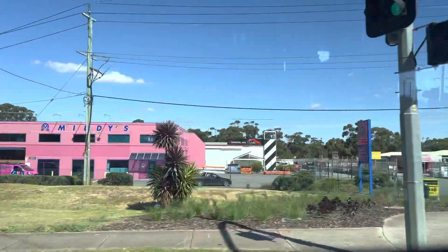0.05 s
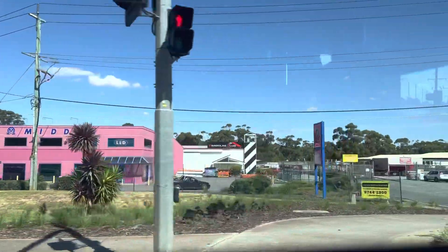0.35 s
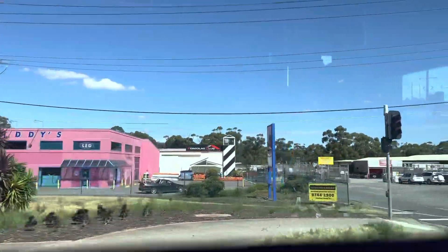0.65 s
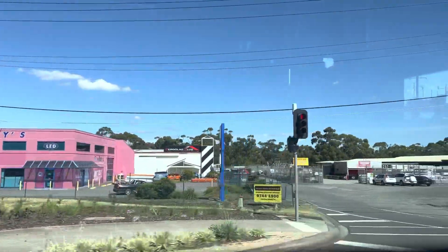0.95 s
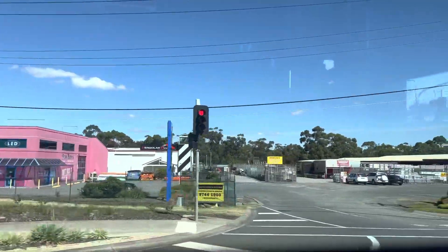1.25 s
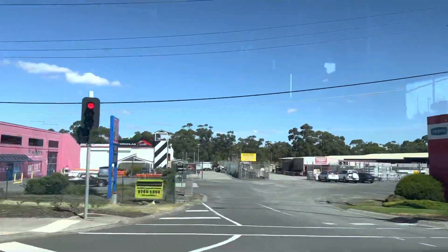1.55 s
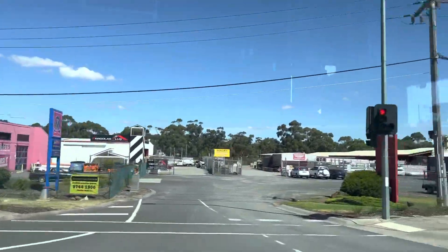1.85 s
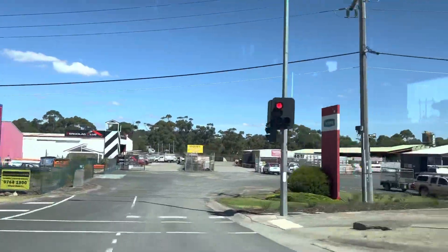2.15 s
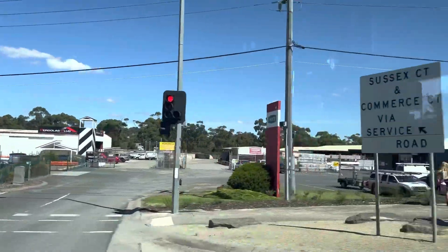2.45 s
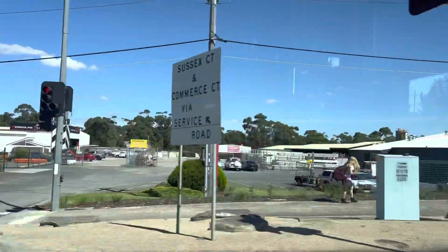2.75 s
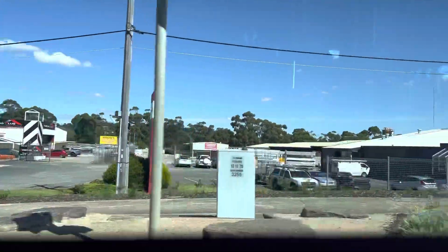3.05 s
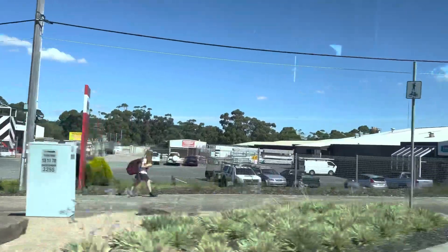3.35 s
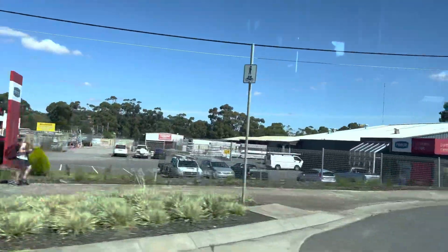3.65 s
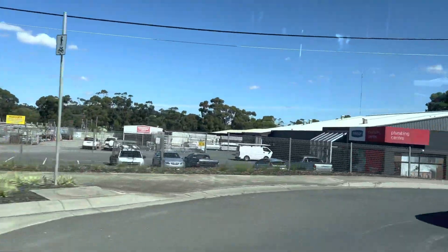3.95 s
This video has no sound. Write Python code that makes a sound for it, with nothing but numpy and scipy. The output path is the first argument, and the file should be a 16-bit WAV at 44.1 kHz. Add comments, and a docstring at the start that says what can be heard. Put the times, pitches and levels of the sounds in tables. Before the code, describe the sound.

A bus engine booms low over road rumble, heard from a passenger seat. After about a second it shifts up, drops in pitch and settles into a pulsing drone, while panels knock and window frames rattle lightly.

```python
"""Inside a city bus that takes a corner and shifts up a gear after one second.
The engine's firing harmonics boom as they pass through the cabin's resonances. In the higher gear a
driveline drone beats against the second harmonic, while the body rumbles and the tyres roar below.
Bumps make the trim buzz, panels knock, window frames chatter and small fittings tick.
A gear hum, thin squeals and one brief rub of a seat fitting lie faintly behind."""
import sys
import numpy as np
from scipy import signal
from scipy.fft import rfft, irfft
from scipy.io import wavfile

SR = 44100
rng = np.random.default_rng(int(sys.argv[2]) if len(sys.argv) > 2 else 0)


def wav_record(signal):
    """Record a signal, one row per channel, as 16-bit PCM in the file named by sys.argv[1]."""
    frames = np.transpose(np.atleast_2d(signal))
    bounded = np.clip(frames, -1, 1)
    # unit amplitude maps onto the largest positive 16-bit level
    quanta = np.round(bounded * 32767).astype(np.int16)
    wavfile.write(sys.argv[1], SR, quanta)


N = 176400
TIME = np.arange(N) / SR

# Engine speed. Each row: time in seconds, firing rate in Hz.
FIRING_RATE = [(0, 57.8), (.3, 60.2), (.85, 61), (1.0, 56.3), (1.12, 50), (1.27, 46.5), (1.55, 44.1),
               (2.1, 44.2), (2.8, 45.1), (4, 47.1)]
# Engine load, easing for the gear change. Each row: time in seconds, gain in dB.
ENGINE_LOAD = [(0, .5), (.5, 1), (.88, 0), (1.15, -4), (1.45, -1.5), (2.9, -2.5), (3.8, 2)]
# Cabin response to an engine harmonic. Each row: frequency in Hz, level in dB before the load gain.
CABIN_RESPONSE = [(44, -32.5), (47, -25.5), (54, -15.5), (60, -13), (88, -20.5), (93, -18), (120, -17.5),
                  (133, -34.5), (160, -37.5), (178, -25), (188, -24.5), (230, -40.5), (370, -41.5)]
# Driveline drone. Each row: time in seconds, level in dB.
DRONE_LEVEL = [(0, -58), (1.2, -55), (1.6, -15), (3.05, -14.5), (3.45, -19.5), (4, -18)]

# Spectra of body rumble, tyre roar and trim buzz. Each row: frequency in Hz, relative density in dB.
RUMBLE_SPECTRUM = [(12, -27), (25, -16), (40, -11.5), (62, 2), (80, 0.5), (98, 2.5), (126, -1.5), (150, -8),
                   (190, -6), (225, -13), (260, -12), (300, -24), (500, -48.5), (2000, -120)]
ROAR_SPECTRUM = [(100, -21), (200, 2), (470, 0), (600, -2.5), (750, -2.5), (900, -12), (1130, -16),
                 (1400, -14.5), (1900, -21.5), (2400, -20.5), (3200, -30.5), (6000, -31.5), (10000, -45),
                 (16000, -66.5)]
BUZZ_SPECTRUM = [(500, -5.5), (1000, 7.5), (2300, 5.5), (3300, 3), (4800, -1.5), (6200, 4), (7300, -1.5),
                 (9300, -8), (15500, -16)]
# Envelopes of the same three. Each row: time in seconds, level in dB.
RUMBLE_LEVEL = [(0, -16), (.6, -14.5), (.85, -12.5), (1.05, -16), (1.35, -13.5), (1.7, -16.5), (2.5, -17.5),
                (4, -18.5)]
ROAR_LEVEL = [(0, -26.5), (.35, -27.5), (.62, -25), (.9, -25.5), (1.04, -29.5), (1.25, -27), (2.1, -29.5),
              (3.1, -28), (3.68, -26), (4, -28.5)]
BUZZ_LEVEL = [(0, -48.5), (.33, -50), (.45, -42), (.6, -44), (.67, -38.5), (.83, -41.5), (.89, -41),
              (.98, -49.5), (1.11, -41), (1.48, -43), (1.62, -45), (2.1, -54.5), (2.55, -51), (3.08, -44.5),
              (3.25, -54.5), (3.55, -44), (3.8, -53), (3.885, -39), (3.94, -55)]

# Blows on panels. Each row: start in seconds, level in dB, factor on the mode frequencies.
KNOCKS = [(.287, -32.5, .98), (.5615, -25, 1.03), (.567, -30, .97), (0.581, -33.5, 1.1),
          (.736, -32.5, 1.05), (.81, -32.5, 1), (1.276, -34, .92), (1.512, -31, .96), (1.73, -33, .95),
          (1.975, -35, .95), (2.253, -37, 1), (2.596, -35, .94), (2.756, -31, .96), (3.644, -30.5, 1.18),
          (3.652, -34, 1.12)]
# Panel modes. Each row: frequency in Hz, relative level in dB, time to fall 60 dB in seconds.
PANEL_MODES = [(960, -1, 0.037), (1800, -9, 0.024), (2168, -3, 0.04), (2355, -7, 0.043), (2670, -9, 0.019),
               (3320, -20.5, 0.02)]
# Rattles of loose window frames. Each row: start in seconds, level in dB.
CHATTERS = [(.566, -42.5), (.647, -36.5), (.707, -36), (.735, -34.5), (.885, -40), (1.17, -42),
            (1.437, -41.5), (1.449, -35.5), (1.499, -40.5), (3.325, -44), (3.52, -44.5), (3.581, -46.5)]
# Ticks of metal fittings. Each row: start in seconds, level in dB, resonance in Hz.
TICKS = [(.649, -37, 13000), (1.174, -41, 12500), (1.221, -39, 13000), (1.307, -39, 12000),
         (1.449, -40, 11100), (2.562, -46, 8600), (3.325, -48, 14000), (3.514, -46, 12500),
         (3.532, -47, 12000), (3.581, -41.5, 9300)]
# Spectra of panel thud, frame chatter and seat rub. Each row: frequency in Hz, relative density in dB.
THUD_SPECTRUM = [(300, -9.5), (1000, 3), (1400, 2), (2400, 4.5), (3300, -10), (7000, -13.5), (14000, -38)]
CHATTER_SPECTRUM = [(1000, -14.5), (2500, 7.5), (4000, 0.5), (6000, 7.5), (9000, -3.5), (15500, -22)]
RUB_SPECTRUM = [(2800, -21.5), (4000, -2), (4500, 3), (5300, -18), (8000, -34)]
# Gear hum and squeals. Each row: start and end in seconds, pitch in Hz, level in dB, leftward pan in dB.
WHINES = [(1.35, 3.08, 305, -37.5, -1), (3.1, 3.31, 1380, -48, 0), (3.64, 3.9, 1315, -54, 0),
          (2.92, 3.2, 7920, -65, 0), (.58, .74, 7950, -58, 0)]

# Likeness of the two microphone signals. Each row: frequency in Hz, correlation (clipped to -1..1 in use).
CORRELATION = [(60, 2), (110, 1.1), (190, 1.35), (270, -0.02), (400, 0.4), (700, 0.04), (1250, -0.5),
               (2200, 0.02)]
# Stereo balance. Each row: frequency in Hz, left minus right in dB.
BALANCE = [(150, 0.36), (300, -2.3), (600, -1.2), (1100, -2.2), (2200, 1), (3800, -0.64), (9000, 0.33)]


def engine(firing_hz, harmonics=6, waver_db=1.23, jitter_rad=0.04):
    """Forced vibration: firing harmonics swell and fade as they slide through the cabin's resonances."""
    out, firing_phase = 0, phase_of(firing_hz)
    for k in range(1, harmonics + 1):
        level_db = at_hz(CABIN_RESPONSE, k * firing_hz) + waver_db * drift(6.2)
        phase = k * (firing_phase + jitter_rad * drift(16.0)) + rng.uniform(0, 2 * np.pi)
        out = out + from_db(level_db) * np.sin(phase)
    return np.sqrt(2) * out * from_db(in_time(ENGINE_LOAD))


def driveline(firing_hz, ratio=2.235):
    """Beating: a drone just above the engine's second harmonic meets it in phase some ten times a second."""
    level_db = in_time(DRONE_LEVEL) - 0.5 * drift(2.3)
    phase = ratio * phase_of(firing_hz) + rng.uniform(0, 2 * np.pi)
    return np.sqrt(2) * from_db(level_db) * np.sin(phase)


def road(firing_hz, flutter_db=0.97, clatter_depth=0.044):
    """Random excitation: the body rumbles, and a fluttering tyre roar pulses slightly with each firing."""
    rumble = cabin_field(rng.standard_normal((2, N)), RUMBLE_SPECTRUM)
    flutter = from_db(flutter_db * drift(13.4))
    clatter = 1 + clatter_depth * np.cos(phase_of(firing_hz))
    roar = cabin_field(rng.standard_normal((2, N)) * flutter * clatter, ROAR_SPECTRUM)
    return rumble * from_db(in_time(RUMBLE_LEVEL)) + roar * from_db(in_time(ROAR_LEVEL))


def panel_knocks(thud_db=-8.5, scatter_rad=1, pan_db=-0.5):
    """Modal ringing: a struck panel sounds as a sum of damped sinusoids over a short thud."""
    out = from_db(thud_db) * cabin_field(bursts([row[:2] for row in KNOCKS], t60_s=0.12), THUD_SPECTRUM)
    hz, mode_db, t60_s = np.transpose(PANEL_MODES)[:, :, None]
    age = TIME[:SR // 10]
    envelopes = from_db(mode_db - 60 * age / t60_s)
    for start_s, level_db, pitch in KNOCKS:
        # each mode reaches the two microphones at different phases
        phases = rng.uniform(0, 2 * np.pi, hz.shape) + scatter_rad * rng.standard_normal((2, *hz.shape))
        modes = envelopes * np.sin(2 * np.pi * pitch * hz * age + phases)
        start = int(start_s * SR)
        out[:, start:start + len(age)] += modes.sum(axis=1) * from_db(level_db)
    return out * pan(pan_db)


def trim_buzz(contacts_per_s=740, spread_db=3.5, hiss_share=0.86):
    """Shot noise: shaken trim makes countless tiny contacts, which the cabin mostly blurs to a hiss."""
    sizes = from_db(spread_db * np.minimum(rng.exponential(1, (2, N)), 4))
    signs = rng.choice([-1, 1], (2, N))
    touching = rng.random((2, N)) < contacts_per_s / SR
    contacts = np.sqrt(1 - hiss_share) * unit_rms(sizes * signs * touching)
    hiss = np.sqrt(hiss_share) * rng.standard_normal((2, N))
    return cabin_field(contacts + hiss, BUZZ_SPECTRUM) * from_db(in_time(BUZZ_LEVEL) + drift(27))


def frame_chatter(grit_db=2.8):
    """Intermittent contact: loose window frames clatter in uneven, decaying bursts."""
    rattle = cabin_field(bursts(CHATTERS, t60_s=0.18), CHATTER_SPECTRUM)
    return rattle * unit_rms(from_db(grit_db * drift(140)))


def fitting_ticks(bandwidth_hz=2000):
    """Damped resonance: each click excites the broad, high mode of a small metal fitting."""
    out, radius = 0, np.exp(-np.pi * bandwidth_hz / SR)
    for start_s, level_db, hz in TICKS:
        click = bursts([(start_s, level_db)], t60_s=0.026, tail_db=-18)
        resonator = [1, -2 * radius * np.cos(2 * np.pi * hz / SR), radius ** 2]
        out = out + signal.lfilter([1, 0, -1], resonator, click + 1e-18)
    return out * np.sqrt((1 - radius ** 2) / 2)


def whines(fade_s=0.054, wander=0.005, waver_db=2.9):
    """Random modulation: the gear hum and squeals are single tones, unsteady in pitch and level."""
    out = 0
    for start_s, end_s, hz, level_db, pan_db in WHINES:
        fade = np.clip(np.minimum(TIME - start_s, end_s - TIME) / fade_s, 0, 1)
        tone = np.sqrt(2) * np.sin(phase_of(hz * (1 + wander * drift(31.0))))
        out = out + fade * tone * from_db(level_db + waver_db * drift(8.6)) * pan(pan_db)
    return out


def seat_rub(peak_s=2.705, half_width_s=0.066, level_db=-50.5):
    """Friction noise: a seat fitting rubs unevenly, swelling and dying away."""
    swell = np.exp(-((TIME - peak_s) / half_width_s) ** 2)
    friction = cabin_field(rng.standard_normal((2, N)), RUB_SPECTRUM)
    return friction * swell * from_db(level_db + 2 * drift(50))


def bursts(blows, t60_s, tail_db=-7, cabin_t60_s=0.35):
    """Exponential decay: each blow's dense, noisy ring adds in power to the cabin's reverberant tail."""
    power = np.zeros(N)
    for start_s, level_db in blows:
        start = int(start_s * SR)
        age = TIME[:N - start]
        direct = from_db(level_db - 60 * age / t60_s)
        tail = from_db(level_db + tail_db - 60 * age / cabin_t60_s)
        power[start:] += direct ** 2 + tail ** 2
    return np.sqrt(power) * rng.standard_normal((2, N))


def cabin_field(pair, spectrum, ripple_db=2, mode_spacing_hz=60.15):
    """Diffuse field: sound coloured by dense cabin modes reaches two microphones partly correlated."""
    hz = np.fft.rfftfreq(N, 1 / SR)
    ripple = np.interp(hz / mode_spacing_hz, np.arange(1000), rng.standard_normal(1000))
    ripple *= np.minimum(hz / 1000, 1) ** 2  # full depth above 1 kHz
    mid, side = rfft(pair) * unit_rms(from_db(at_hz(spectrum, hz) + ripple_db * ripple))
    correlation = np.clip(at_hz(CORRELATION, hz), -1, 1)
    common = np.sqrt((1 + correlation) / 2) * mid
    opposed = np.sqrt((1 - correlation) / 2) * side
    return irfft(np.array([common + opposed, common - opposed]) * pan(at_hz(BALANCE, hz)), N)


def drift(corner_hz, step=40):
    """Low-pass noise: a smooth random wander of unit spread."""
    pole = np.exp(-2 * np.pi * corner_hz * step / SR)
    noise = rng.standard_normal(N // step + 2002)
    slow = signal.lfilter([1], [1, -2 * pole, pole ** 2], noise)[2000:]  # once the filter has settled
    return np.interp(np.arange(N) / step, np.arange(len(slow)), unit_rms(slow))


def phase_of(hz):
    """Phase in radians, the time integral of frequency."""
    return 2 * np.pi * np.cumsum(hz) / SR


def pan(db):
    """Left and right gains for a level difference in dB."""
    return from_db(np.array([[1], [-1]]) * db / 2)


def from_db(db):
    """Decibels to amplitude ratio."""
    return 10 ** (np.asarray(db) / 20)


def unit_rms(x):
    """Normalisation to unit power."""
    return x / np.sqrt(np.mean(x ** 2) + 1e-20)


def in_time(rows):
    """Linear interpolation of a table at every sample."""
    return np.interp(TIME, *np.transpose(rows))


def at_hz(rows, hz):
    """Interpolation of a table on a log-frequency axis."""
    row_hz, values = np.transpose(rows)
    return np.interp(np.log(np.maximum(hz, 1)), np.log(row_hz), values)


def scene(left_lag_s=0.00022):
    """Superposition: engine, road and rattles add at a passenger seat."""
    firing_hz = in_time(FIRING_RATE)
    boom = engine(firing_hz) + driveline(firing_hz)
    left_boom = np.interp(TIME - left_lag_s, TIME, boom)
    rattles = panel_knocks() + frame_chatter() + fitting_ticks() + seat_rub()
    return np.array([left_boom, boom]) + road(firing_hz) + whines() + trim_buzz() + rattles


def record(dry):
    """Soft saturation rounds the highest peaks; a low-pass filter stops the treble above 16.8 kHz."""
    rounded = dry / (1 + dry ** 8) ** (1 / 8)
    return signal.sosfilt(signal.cheby2(16, 70, 16800, fs=SR, output="sos"), rounded)


dry = scene()
out = record(dry)
wav_record(out)
```